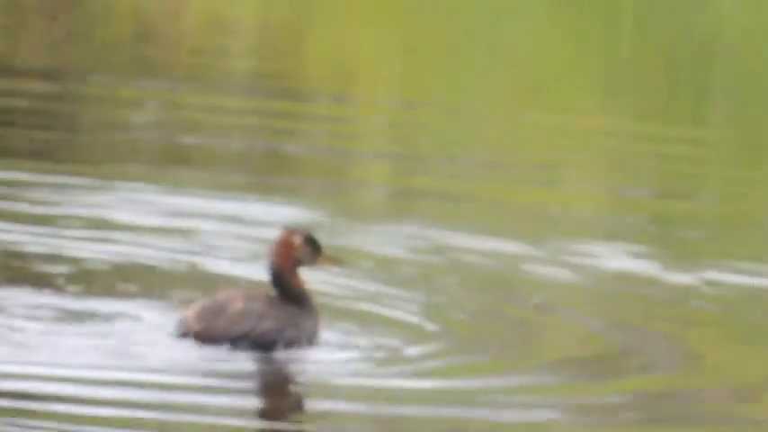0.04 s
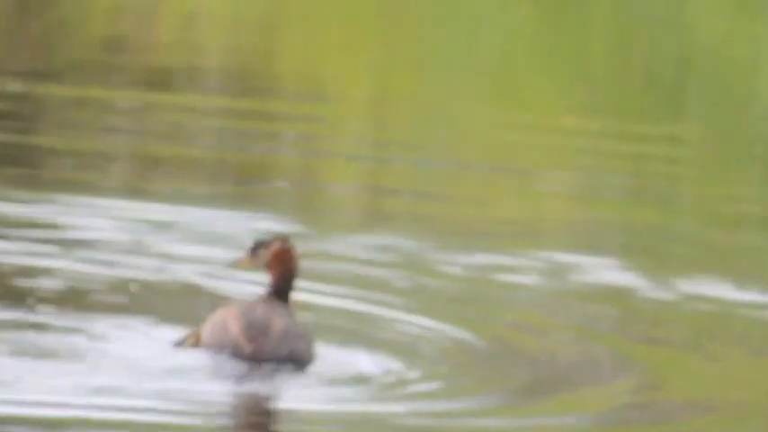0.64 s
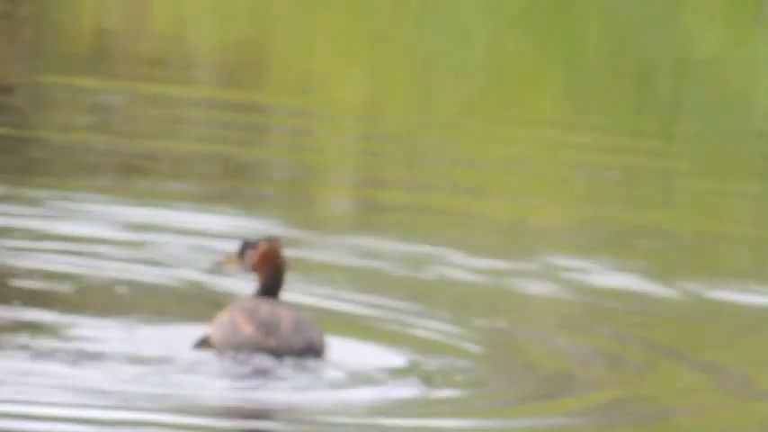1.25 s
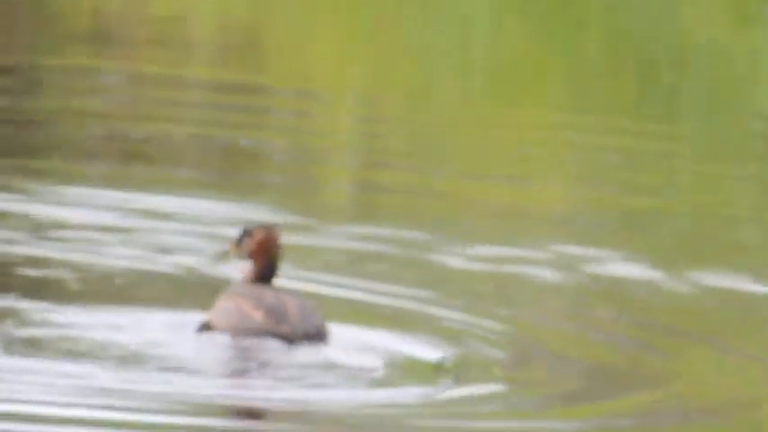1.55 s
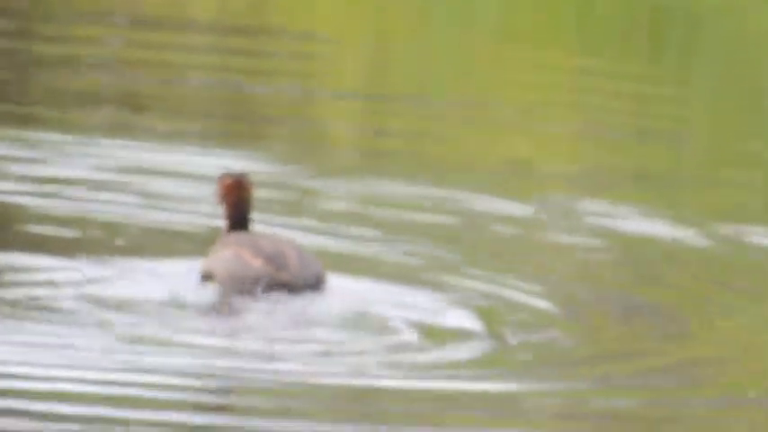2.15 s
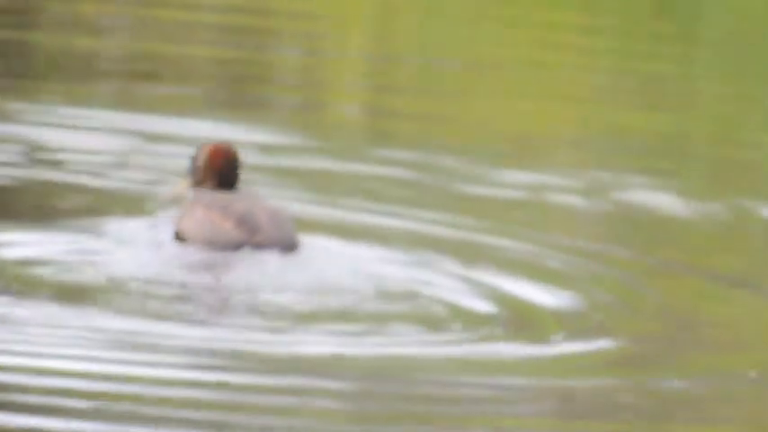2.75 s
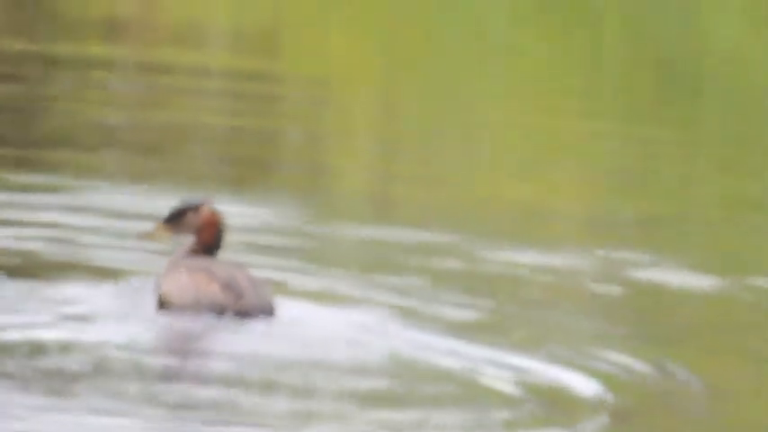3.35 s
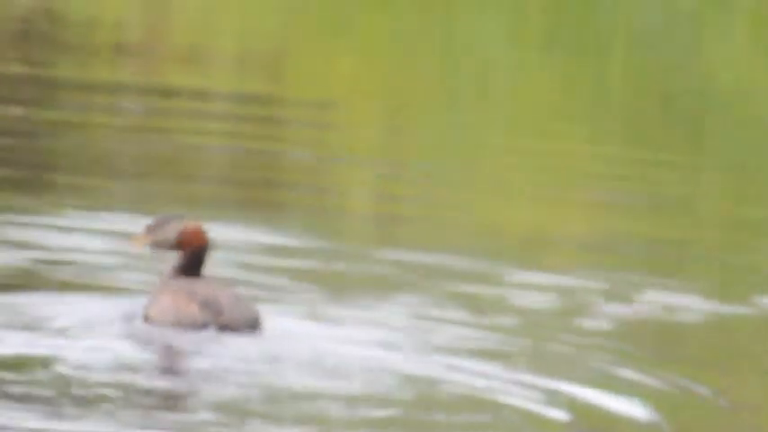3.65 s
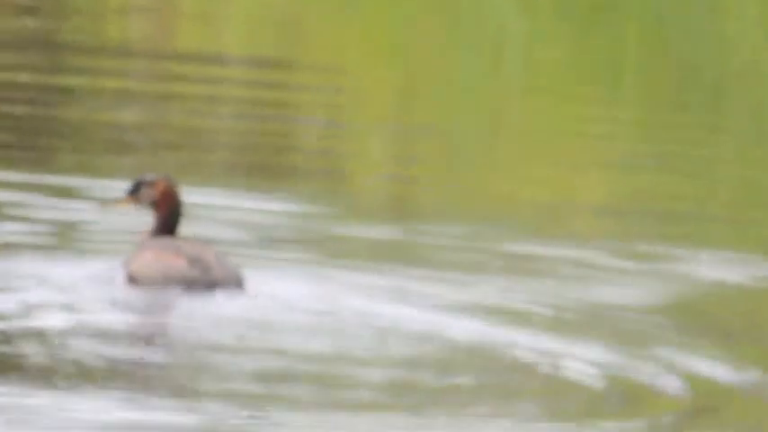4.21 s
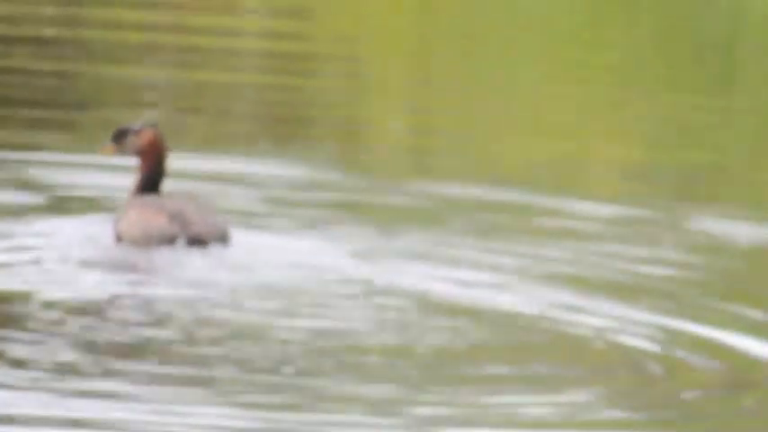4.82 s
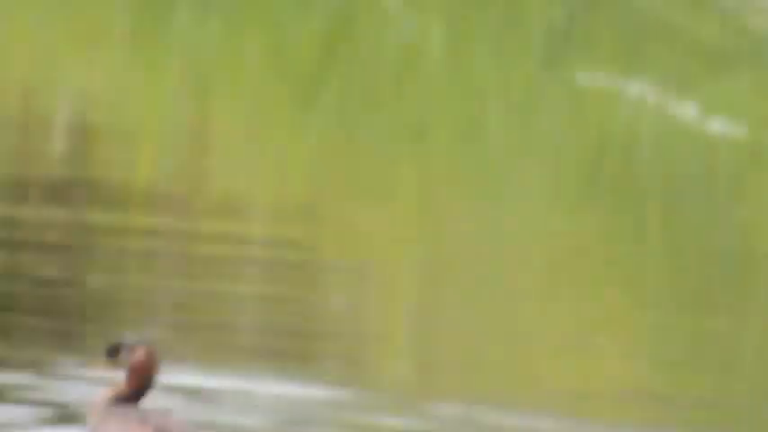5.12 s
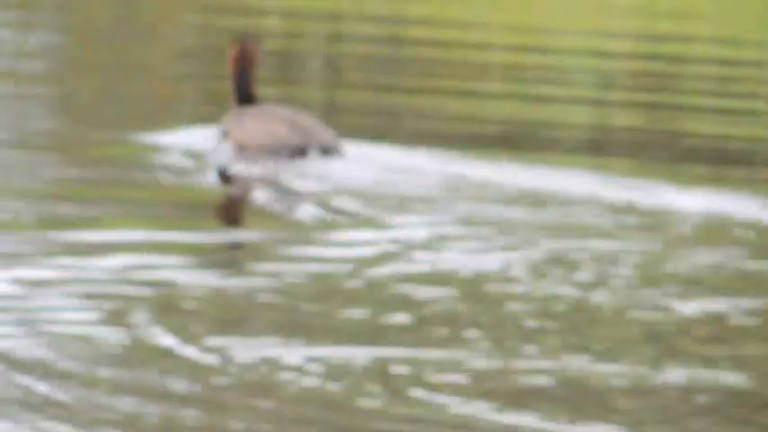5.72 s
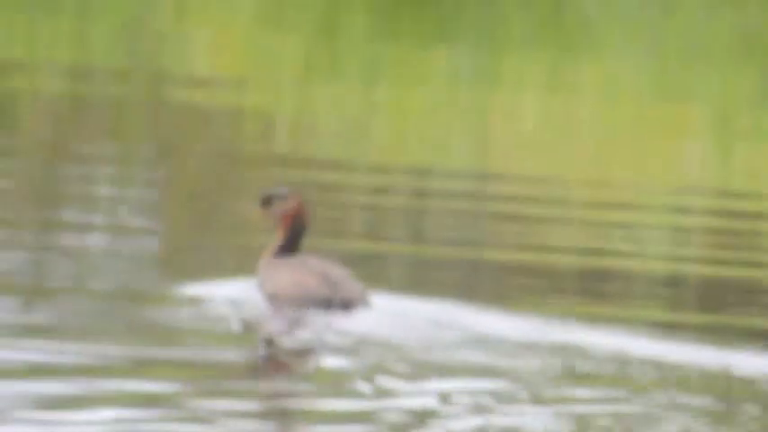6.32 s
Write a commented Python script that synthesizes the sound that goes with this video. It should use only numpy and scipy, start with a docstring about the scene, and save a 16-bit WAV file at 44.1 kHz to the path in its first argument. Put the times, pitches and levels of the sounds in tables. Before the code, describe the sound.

At a pond, gusts of wind rumble and thump on the microphone, mostly on the left, over a steady hiss of distant water and a deep hum. Small waterbirds on the right give faint, high, rapid trills in bursts with a slight echo, two briefly overlapping. A few tiny splashes and a soft falling whistle follow. Near the end, the wind drops abruptly with a click and the last trills continue.

```python
"""A reedy pond: from the start, distant water hisses over a faint, deep hum, and gusts buffet the
microphone, mostly on the left. Small waterbirds on the right trill in quick high and low notes that
echo off the reeds; near 1.6 s two sing together. A few short splashes and ticks come from 3.5 s on, and
at about 5 s a bird gives one falling, purring whistle. At 5.73 s there is a sharp click and the wind
drops abruptly; the last trills sound over the water and the hum."""
import sys
import numpy as np
from scipy import signal
from scipy.fft import rfft, irfft
from scipy.io import wavfile
from scipy.ndimage import uniform_filter1d, map_coordinates

SR = 44100
rng = np.random.default_rng(int(sys.argv[2]) if len(sys.argv) > 2 else 0)


def int16_out(signal):
    """Quantize to a 16-bit WAV file."""
    q = np.round(np.clip(np.atleast_2d(signal).T, -1, 1) * 32767)
    wavfile.write(sys.argv[1], SR, q.astype(np.int16))


N = 289737
TIME = np.arange(N) / SR


def birds(echo_db=2):
    """The calls come from the right; much of their sound arrives as echo from the reeds."""
    trills = trill()
    calls = trills + rasp(trills) + whistle()
    echo = from_db(echo_db)
    direct = calls * np.sqrt(2 / (1 + echo ** 2))
    return panned(direct, left_db=-7.5) + panned(reeds(direct * echo), left_db=-3.0)


def trill(note_s=.036, arch_hz=130, slur_hz=380, rise_hz=60, flutter_hz=42, boost_db=0.5):
    """Each note is a nearly pure tone that slides up, arches over and slides down as it fades."""
    out = np.zeros(N)
    flutter = flutter_hz * drift(300)
    notes = trill_notes()
    quirks = rng.normal(1, .3, (len(notes), 2))  # no two notes bend alike
    place = np.linspace(-1, 1, int(note_s * SR))  # from a note's start to its end
    swell = signal.windows.tukey(len(place), .7)
    for (middle_s, hz, db), (bend, slope) in zip(notes, quirks):
        span = np.clip(int(middle_s * SR) - len(place) // 2 + np.arange(len(place)), 0, N - 1)
        arch = arch_hz * (1 / 4 - place ** 2) - slur_hz * bend * place ** 4
        pitch = hz + arch + rise_hz * slope * place + flutter[span]
        out[span] += from_db(db + boost_db) * swell * np.sin(phase_of(pitch))
    return out


def trill_notes(scatter_hz=10, scatter_db=0.8):
    """A bird swaps between two pitches, growing louder, then softer. Gives time_s, pitch_hz, level_db."""
    # One trill a row: first_note_s, last_note_s, gap_s, speed_up (0-1), pitch_hz, second_note_step_hz,
    # glide_hz, peak_db, peak_place (0-1), taper_db, second_note_step_db
    trills = [(0.216, 0.489, .039, .02, 3870, 230, -17, -65.5, 0.45, 10, 2.5),
              (0.883, 1.393, .0464, 0.1, 3693, 185.5, -71.5, -49.5, 0.57, 25.5, -1.5),
              (1.43, 1.584, .05, 0, 3800, 63, 60.5, -62, .5, 3, 1),
              (1.631, 1.994, .0454, 0.04, 3785, -200, 13.5, -50, .85, 7.5, -5.5),
              (1.634, 1.98, .049, .05, 3974, -600, 14, -56, 0.2, 5, -3.5),
              (4.026, 4.413, .043, .05, 3860, -210, -75, -55, 0.64, 24, -4.5),
              (5.738, 6.062, .054, .03, 3842, 30, -67, -53.5, 0.49, 10.5, -0.5),
              (5.968, 6.05, .082, .02, 4030, -320, -12, -59, .5, 4, 2),
              (6.212, 6.491, .056, 0.08, 3800, -11, 86, -53.5, 0.87, 11, -.5)]
    notes = []
    for first, last, gap, speed_up, hz, step_hz, glide_hz, db, peak_place, taper_db, step_db in trills:
        progress = np.linspace(0, 1, int(round((last - first) / gap)) + 1)
        is_second = np.arange(len(progress)) % 2
        off_pitch, off_level = rng.standard_normal((len(progress), 2)).T
        time_s = first + (last - first) * (progress + speed_up * progress * (1 - progress))
        pitch_hz = hz + step_hz * is_second + glide_hz * progress + scatter_hz * off_pitch
        level_db = db - taper_db * (progress - peak_place) ** 2 + step_db * is_second
        notes.extend(zip(time_s, pitch_hz, level_db + scatter_db * off_level))
    return notes


def rasp(calls, below_hz=300, spread_hz=130, level_db=-15.0):
    """The throat is not quite steady: a hoarse copy rides just below each note."""
    wobble = phase_of(below_hz + spread_hz * drift(250))
    lowered = np.real(signal.hilbert(calls) * np.exp(-1j * wobble))
    return from_db(level_db) * lowered


def whistle(start_s=5.06, end_s=5.45, pitch_hz=4040, fall_hz_per_s=850, purr_hz=115, level_db=-65.5):
    """One falling note that swells and fades, chopped into a fast purr."""
    age = np.clip(TIME - start_s, 0, end_s - start_s)
    swell = np.sin(np.pi * age / (end_s - start_s)) ** 2
    pitch = pitch_hz - fall_hz_per_s * age + 60 * drift(200)
    purr = 1 + .7 * np.sin(phase_of(purr_hz * (1 + 0.057 * drift(30))))
    return from_db(level_db) * swell * purr * np.sin(phase_of(pitch))


def reeds(sound, near_fade_s=0.11, far_fade_s=1.0, far_db=-8.0, build_s=0.0097):
    """Nearby stems give a short echo and the banks a longer one; each ear gets its own."""
    age = TIME[:SR]
    near, far = [rms_one(rng.standard_normal((2, SR)) * from_db(-60 * age / fade_s))
                 for fade_s in (near_fade_s, far_fade_s)]
    build_up = (1 - np.exp(-age / build_s)) ** 2
    echoes = rms_one((near + from_db(far_db) * far) * build_up) / np.sqrt(SR)
    return signal.fftconvolve(sound[None], echoes, axes=1)[:, :N]


def wind(sheltered_db=-12.5, calm_db=-22, flutters_per_s=24):
    """Gusts push and shake the air at each side of the microphone; the right side is sheltered."""
    # Tone of the slow pushes and of the faster shaking: frequency_hz, relative_level_db
    push_spectrum = [(12, -11.5), (22, -3.5), (32, 1), (52, 2.5), (68, -5), (90, -15), (130, -49)]
    shake_spectrum = [(45, -22.5), (65, -1), (80, 4), (105, -3.5), (135, -6.5), (175, -20.5), (230, -33.5),
                      (400, -54)]
    push, shake = gusts()
    flutter = drift(flutters_per_s)
    push = push * from_db(1.5 + 2.0 * flutter)
    shake = shake * from_db(2.5 + 3.5 * flutter)
    left, right = [push * rough_air(push_spectrum) + shake * rough_air(shake_spectrum) for _ in range(2)]
    calm = np.interp(TIME, [5.71, 5.75], [0, 1])  # 1 once the wind has dropped
    return from_db(calm_db * calm) * np.array([left, from_db(sheltered_db) * right])


def gusts(rise_s=.03, fall_s=0.044):
    """Each gust rises out of a breeze, holds and falls back. Gives the strength of push and shake."""
    # One gust a row, with relative levels: start_s, end_s, push_db, shake_db
    gust_list = [(0.174, 0.466, -36, -63), (0.508, 0.781, -28.5, -37.5), (0.975, 1.22, -29, -43),
                 (1.238, 1.628, -28.5, -37), (1.717, 1.836, -28.5, -45.5), (1.919, 2.126, -29.5, -45.5),
                 (2.339, 2.412, -32.5, -48.5), (2.529, 2.618, -28.5, -40), (2.685, 2.714, -34.5, -63),
                 (3.042, 3.104, -29.5, -50), (3.472, 3.722, -31.5, -52), (3.762, 4.01, -28.5, -40),
                 (4.06, 4.124, -26.5, -31.5), (4.245, 4.439, -29, -44), (4.496, 4.55, -32.5, -46),
                 (4.65, 4.873, -32.5, -47.5), (5.058, 5.168, -28, -43.5), (5.22, 5.46, -36, -60),
                 (5.558, 5.703, -36.5, -54)]
    push, shake = from_db(-45), from_db(-60.5)  # the light breeze between gusts
    for start_s, end_s, push_db, shake_db in gust_list:
        rising, falling = 1 + (TIME - start_s) / rise_s, 1 - (TIME - end_s) / fall_s
        force = np.clip(np.minimum(rising, falling), 0, 1)
        push = np.maximum(push, from_db(push_db) * force)
        shake = np.maximum(shake, from_db(shake_db) * force ** 2)
    return push, shake


def rough_air(spectrum, evenness=0.86):
    """The rumble of churning air, partly evened out so that the gust sets how strong it is."""
    rumble = noise(spectrum)
    power = uniform_filter1d(np.abs(signal.hilbert(rumble)) ** 2, SR // 40)
    strength = uniform_filter1d(np.sqrt(power + 0.022), SR // 100)
    return rms_one(rumble / strength ** evenness)


def eddies(trim_db=-1.0, steepness=0.15):
    """A whirl of air crossing the microphone's left side gives one sharp push, or a short run of them."""
    # The strongest whirls: middle_s, level_db, pitch_hz, cycle_count
    whirls = [(0.544, -14, 61, 0.73), (0.596, -20, 55.6, 0.55), (.700, -15, 56.3, 4.6),
              (0.744, -20.5, 50, 1), (0.995, -15, 53, 1.3), (1.299, -12.5, 72.4, 2.85),
              (1.38, -18.5, 65.3, 1.8), (1.602, -11.5, 89, 0.97), (1.769, -17.5, 61.7, 1.4),
              (2.594, -16.5, 47, 0.51), (3.472, -14.5, 44.4, 0.73), (3.783, -11.5, 51.3, 0.58),
              (3.836, -15, 69.5, 0.73), (4.097, -11.5, 95.5, 1.2), (4.31, -14.5, 40, 0.74),
              (5.153, -17.5, 79.5, 0.74)]
    left = np.zeros(N)
    for middle_s, db, hz, cycles in whirls:
        near = np.abs(TIME - middle_s) < 3 * cycles / hz
        turn = 2 * np.pi * hz * (TIME[near] - middle_s)
        pressure = (np.cos(turn) + steepness * np.cos(2 * turn)) / (1 + steepness)
        left[near] += from_db(db + trim_db) * pressure / np.cosh(turn / (2 * cycles))
    return np.array([left, np.zeros(N)])


def water(hiss_db=-52.5):
    """Far running water is an even hiss, alike in both ears only in the bass; a dull rush fades behind."""
    # Tone of the hiss: frequency_hz, relative_level_db
    hiss_spectrum = [(40, -2.5), (100, 2), (155, 2.5), (250, -2.1), (380, -2.5), (520, -4.5), (800, -7),
                     (1100, -8), (1550, -8.5), (2000, -10), (3000, -11.5), (4500, -13), (5600, -13),
                     (9000, -13)]
    # How alike the two ears hear it: frequency_hz, likeness (1 = the same, 0 = unrelated)
    ear_likeness = [(60, 1), (240, 0.4), (480, 0.18), (960, -0.0016), (1900, -0.086), (4000, -0.027),
                    (7000, -0.012)]
    # Loudness of the far rush: time_s, level_db
    rush_levels = [(0, -64), (.22, -62.5), (.4, -71), (1.5, -67), (3, -72), (6.57, -80)]
    alike = np.clip(at_hz(ear_likeness, np.fft.rfftfreq(N, 1 / SR)), -.99, .99)
    shared, opposed = [irfft(rfft(noise(hiss_spectrum)) * np.sqrt((1 + sign * alike) / 2), N)
                       for sign in (1, -1)]
    rush_db = np.interp(TIME, *np.transpose(rush_levels))
    rush = from_db(rush_db) * noise_band(low_hz=470, high_hz=604)
    return from_db(hiss_db) * np.array([shared + opposed, shared - opposed]) + rush


def splashes_and_clicks(band_ratio=1.27):
    """Short splashes and ticks, and a sharp click at 5.73 s where the sound changes abruptly."""
    # One quickly fading burst of noise a row: start_s, level_db, pitch_hz, decay_s
    bursts = [(3.543, -61, 3500, 0.045), (5.147, -56, 3200, 0.0051), (5.147, -59, 1220, 0.0088),
              (5.664, -59, 2600, 0.0072), (5.663, -54.5, 1120, 0.0087), (5.728, -54, 2500, 0.004)]
    out = np.zeros(N)
    for start_s, db, hz, decay_s in bursts:
        age = np.maximum(TIME - start_s, 0)
        hiss = noise_band(hz / band_ratio, hz * band_ratio)
        out += from_db(db) * hiss * (age > 0) * np.exp(-age / decay_s)
    return panned(out, left_db=-9.0)


def hum(pitch_hz=30, waver=.012, level_db=-43):
    """A deep, nearly pure hum that wavers a little in pitch and loudness."""
    tone = np.sqrt(2) * np.sin(phase_of(pitch_hz * (1 + waver * drift(5))))
    return panned(from_db(level_db + .6 * drift(8)) * tone, left_db=4.5)


def whines(flicker_db=3.0):
    """Thin tones that wander in pitch, perhaps from machinery far away."""
    # One faint tone a row: pitch_hz, wander_width_hz, level_db
    tones = [(273.3, 8, -78.5), (336.4, 20, -72), (507, 7, -71), (693, 5, -76.5), (749, 6, -79.5),
             (1308, 29, -77)]
    out = np.zeros(N)
    for hz, width_hz, db in tones:
        tone = np.sin(phase_of(hz + width_hz / 2 * drift(2 * width_hz)))
        out += from_db(db + flicker_db * drift(8.7)) * tone
    return out


def from_db(db):
    """Turn decibels into a number to multiply a sound by."""
    return 10 ** (np.asarray(db) / 20)


def rms_one(sound):
    """Scale a sound to an average power of 1."""
    return sound / np.sqrt(np.mean(sound ** 2) + 1e-20)


def phase_of(pitch_hz):
    """The angle a wave has turned through as it follows a changing pitch."""
    return 2 * np.pi * np.cumsum(pitch_hz) / SR


def at_hz(table, hz):
    """Read between a table's rows, giving every octave the same room."""
    frequencies, values = np.transpose(table)
    return np.interp(np.log(hz + 1e-9), np.log(frequencies), values)


def noise(spectrum):
    """Noise of power 1, shaped by a table and fading beyond the table's ends."""
    hz = np.fft.rfftfreq(N, 1 / SR) + 1e-3
    ends = 1 / (1 + (hz / spectrum[-1][0] / 2) ** 4) / (1 + (spectrum[0][0] / hz / 2) ** 4)
    return rms_one(irfft(rfft(rng.standard_normal(N)) * from_db(at_hz(spectrum, hz)) * ends, N))


def noise_band(low_hz, high_hz):
    """Noise of power 1, mostly between two frequencies."""
    band = signal.butter(2, [low_hz, high_hz], "band", fs=SR, output="sos")
    return rms_one(signal.sosfilt(band, rng.standard_normal(N)))


def drift(turns_per_s):
    """A smooth random wander, usually within about 1 of zero."""
    points = rng.standard_normal(4000)
    return map_coordinates(points, [TIME * turns_per_s], order=2, mode="wrap")


def panned(sound, left_db):
    """Make a sound louder in the left ear by left_db; below zero it moves to the right."""
    return sound * from_db(np.array([[left_db], [-left_db]]) / 2)


def scene():
    """Birds and water in the distance, wind right on the microphone."""
    return birds() + water() + splashes_and_clicks() + hum() + whines() + wind() + eddies()


def record(dry, cutoff_hz=7070):
    """The recorder cuts the treble steeply."""
    return signal.sosfilt(signal.ellip(14, .1, 80, cutoff_hz, fs=SR, output="sos"), dry)


dry = scene()
out = record(dry)
int16_out(out)
```